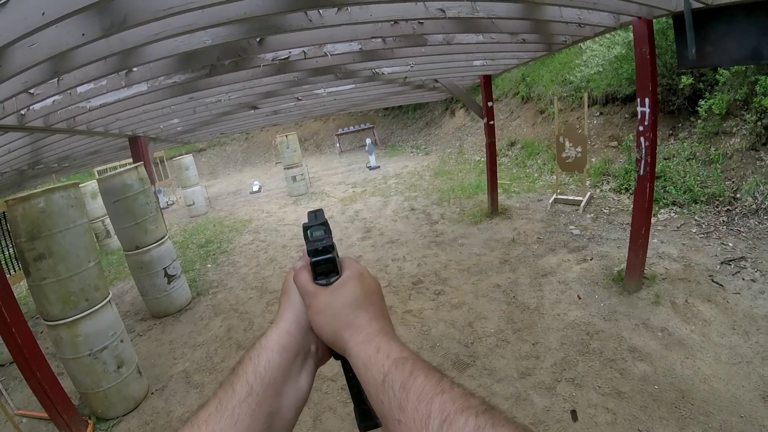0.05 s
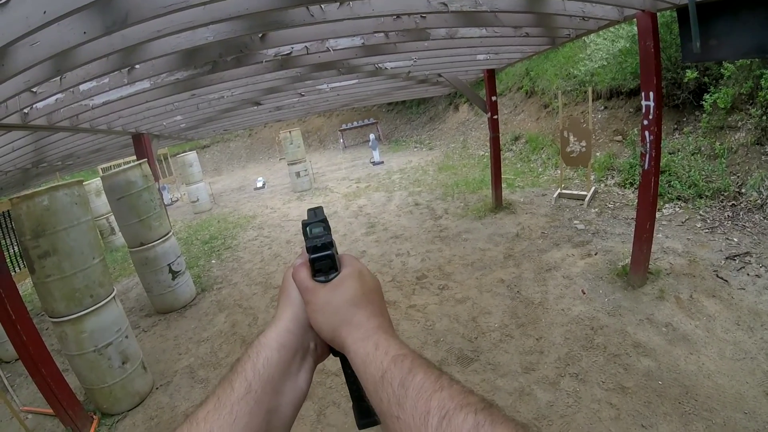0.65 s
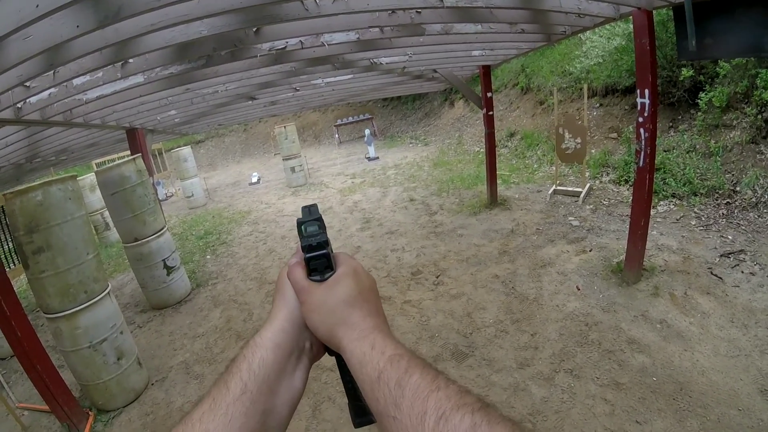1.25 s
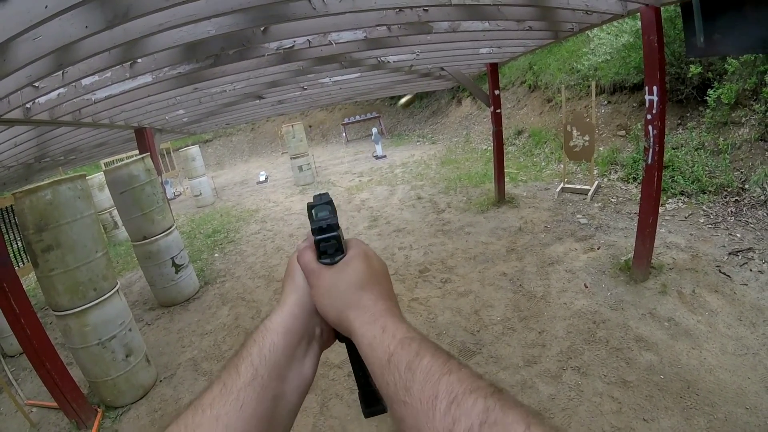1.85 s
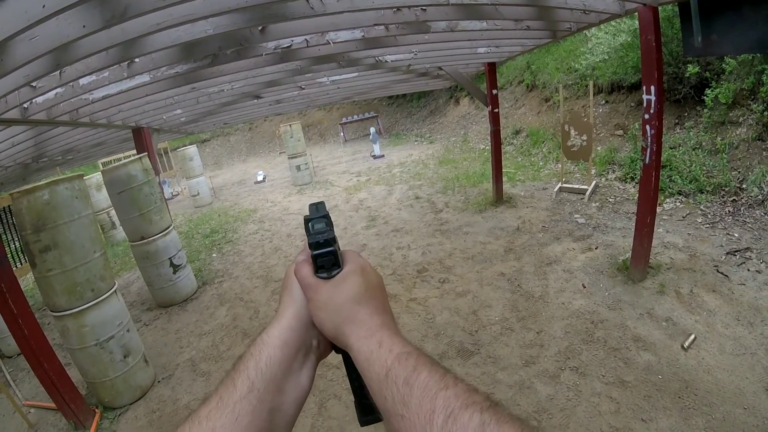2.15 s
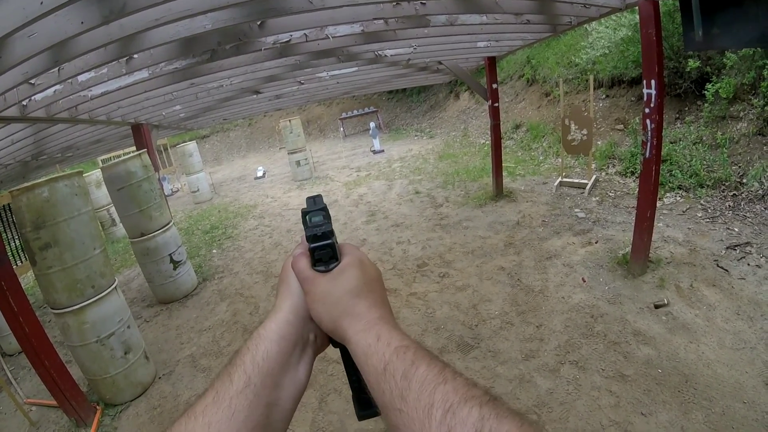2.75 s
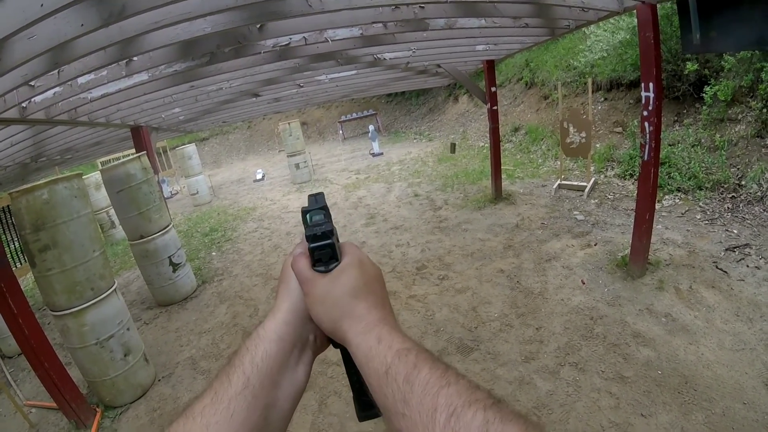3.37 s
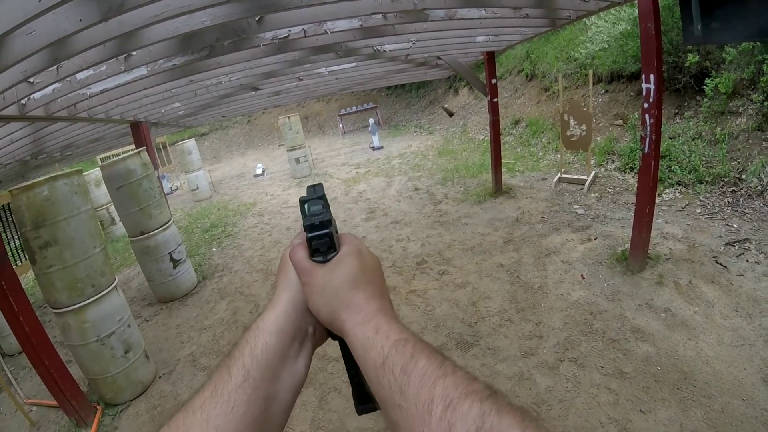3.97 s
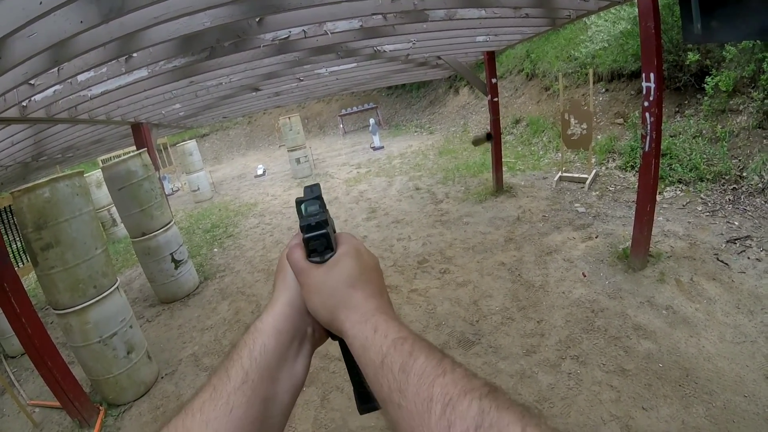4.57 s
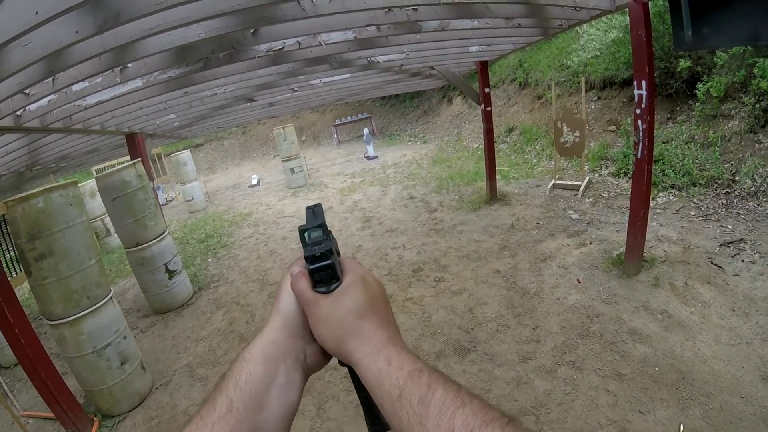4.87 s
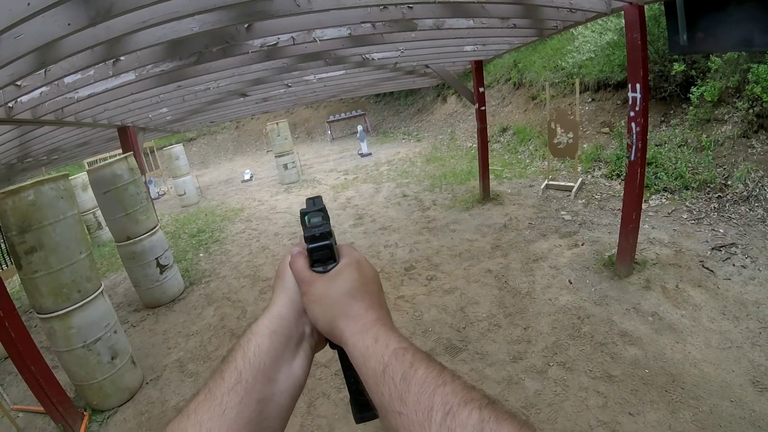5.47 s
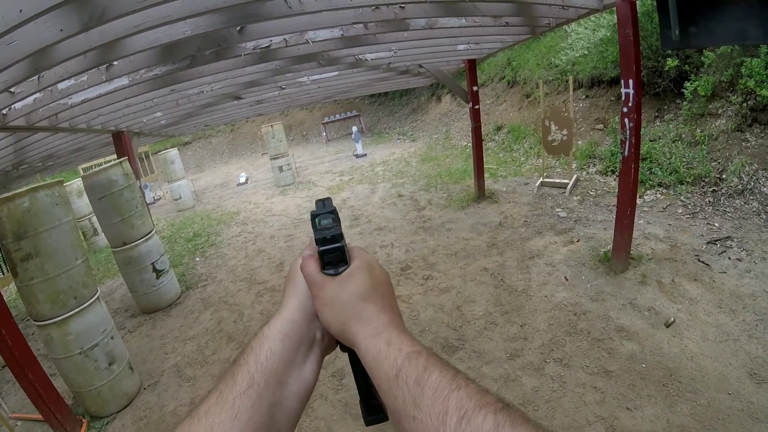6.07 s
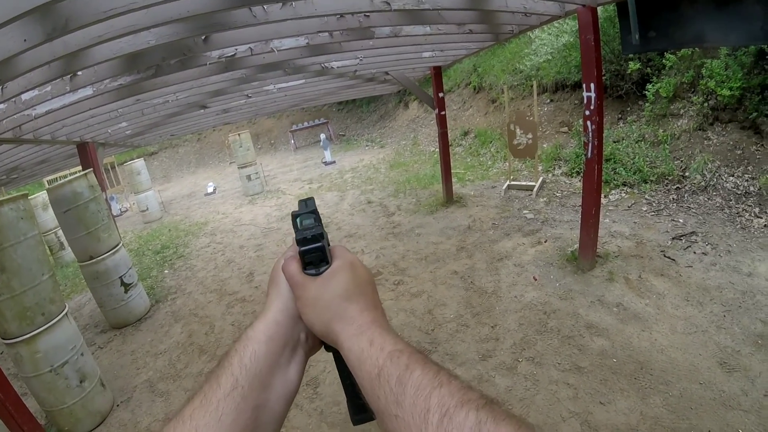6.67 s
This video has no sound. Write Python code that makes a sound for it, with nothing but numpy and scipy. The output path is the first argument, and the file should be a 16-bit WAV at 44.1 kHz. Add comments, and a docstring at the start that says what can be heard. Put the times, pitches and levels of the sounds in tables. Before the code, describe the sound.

A pistol fires nine single shots close to the microphone, mostly under a second apart, in a roofed outdoor shooting bay. Each sharp crack slaps off the roof and trails away in echoes. A faint trigger click follows most shots. The seventh and eighth shots each bring a bright ring from a steel plate, and the last comes right at the end.

```python
"""Pistol shots in a roofed shooting bay.

Each shot is a blast and a pressure wave, answered by the roof and by distant banks. The trigger clicks
as it resets, and two bullets ring steel plates, over faint ticks, thuds, hiss and rumble. The limiter
of a camera on the shooter's head ducks just ahead of each shot and recovers slowly, holding up the tail."""
import sys
import numpy as np
from scipy import signal
from scipy.fft import rfft, irfft, next_fast_len
from scipy.io import wavfile
from scipy.ndimage import uniform_filter1d, map_coordinates

SR = 44100
rng = np.random.default_rng(int(sys.argv[2]) if len(sys.argv) > 2 else 0)


def wav_record(signal):
    """Record a signal, one row per channel, as 16-bit PCM in the file named by sys.argv[1]."""
    frames = np.transpose(np.atleast_2d(signal))
    bounded = np.clip(frames, -1, 1)
    # unit amplitude maps onto the largest positive 16-bit level
    quanta = np.round(bounded * 32767).astype(np.int16)
    wavfile.write(sys.argv[1], SR, quanta)


N = 296352


def amp(db):
    """Amplitude ratio of a level in decibels."""
    return 10 ** (np.asarray(db) / 20)


def unit(x):
    """The signal scaled to an rms of 1."""
    return x / np.sqrt(np.mean(x ** 2) + 1e-20)


def add(track, start_s, sound):
    """Superposition: a sound sums into the track from its start time."""
    start = round(start_s * SR)
    part = sound[max(-start, 0):N - start]
    track[max(start, 0):][:len(part)] += part


def highpass(x, hz, order=2):
    """A Butterworth filter attenuates frequencies below its cutoff."""
    return signal.sosfilt(signal.butter(order, hz, "high", fs=SR, output="sos"), x)


def coloured(x, spectrum, resonances=()):
    """A minimum-phase filter of unit power gain imposes a spectrum with Lorentzian peaks and dips."""
    size = 2 * next_fast_len(len(x) // 2 + SR // 8)
    hz = np.fft.rfftfreq(size, 1 / SR)
    point_hz, point_db = np.transpose(spectrum)
    db = np.interp(np.log(hz + 1), np.log(point_hz), point_db)
    db += sum(lift / (1 + (2 * (hz - centre) / width) ** 2) for centre, width, lift in resonances)
    cepstrum = irfft(np.log(unit(amp(db))))
    cepstrum[1:size // 2] *= 2  # folding onto positive time makes the filter causal
    cepstrum[size // 2 + 1:] = 0
    return irfft(rfft(x, size) * np.exp(rfft(cepstrum)), size)[:len(x)]


def burst(envelope, passes=8):
    """A cluster of shocks: noise with a nearly flat spectrum under an envelope."""
    x = envelope * rng.standard_normal(len(envelope))
    for _ in range(passes):
        x = irfft(np.exp(1j * np.angle(rfft(x))), len(x))
        local_rms = np.sqrt(np.abs(uniform_filter1d(x * x, size=48)) + 1e-20)
        x *= envelope / local_rms
    return x


def shock(t, start_s, hold_s, fall_s):
    """Envelope of a shock: an abrupt front, a plateau and an exponential decay."""
    return (t >= start_s) * np.exp(-np.maximum(t - start_s - hold_s, 0) / fall_s)


def muzzle_blast(t):
    """The blast is a cluster of thin shocks, which carry little bass."""
    # Blast spectrum. Each row: frequency in Hz, relative level in dB.
    spectrum = [(100, -11.5), (400, 1), (800, -5), (1400, -4.5), (2200, -2), (3000, -6.5), (3800, -3.5),
                (4700, -13), (5700, -0.5), (6700, 2.5), (7500, -10.5), (9000, -15.5), (12000, -25.5),
                (16000, -47.5)]
    shocks = burst(shock(t, start_s=0, hold_s=.0018, fall_s=.00083))
    return highpass(coloured(shocks, spectrum), hz=150)


def pressure_wave(t, push_s, suction_at_s=.0038):
    """The expanding gas cloud sends out a compression followed by a rarefaction."""
    def lobe(age_s):
        phase = np.maximum(age_s / push_s, 0)
        return phase * np.exp(1 - phase)
    return .65 * (lobe(t) - lobe(t - suction_at_s))


def early_reflections(t, scatter_t60_s=.092):
    """The roof reflects the blast as a slap; beams and barrels then scatter it."""
    # Spectra of the slap and the scatter. Each row: frequency in Hz, relative level in dB.
    slap_spectrum = [(100, -6), (370, -22.5), (750, 0.5), (1100, 1), (2200, -2), (3300, -7), (4300, -3.5),
                     (5500, -6.5), (6600, -11), (7600, -8), (10000, -22.5), (16000, -53.5)]
    scatter_spectrum = [(60, -29.5), (200, -15), (330, 4.5), (750, 13.5), (1200, 5), (2500, 5.5),
                        (4200, -18.5), (5500, -23), (6600, -21), (7600, -21), (10000, -31), (12000, -37),
                        (16000, -53)]
    # Resonances under the roof. Each row: frequency in Hz, width in Hz, lift in dB.
    resonances = [(400, 150, 6), (570, 120, -3), (750, 180, 6), (1020, 130, -3), (2005, 120, 3),
                  (2520, 130, 3), (6650, 350, 3)]
    early = t[:SR // 4]
    roof = shock(early, start_s=.0043, hold_s=.001019, fall_s=.00063)
    slap = amp(17) * coloured(burst(roof), slap_spectrum, resonances)
    beams = amp(7 - 60 * early / scatter_t60_s) * (early > .002)
    barrels = amp(8) * shock(early, start_s=.0143, hold_s=.0027, fall_s=.0017)
    scatter = coloured(burst(np.hypot(beams, barrels)), scatter_spectrum, resonances)
    return highpass(np.pad(slap + scatter, (0, len(t) - len(early))), hz=150)


def tail_db(t, onset_s=.014, spreading_power=1.1464, loss_db_per_s=21.5):
    """Geometric spreading and absorption lower the level that returns t seconds after a shot."""
    travel_s = np.maximum(t, onset_s)
    return -20 * spreading_power * np.log10(travel_s / onset_s) - loss_db_per_s * (travel_s - onset_s)


def reverberation(t, build_s=.0053, patch_db=3, smooth_above_hz=2000):
    """Diffuse reflection: the banks return sound in patches, while air absorption drains the treble."""
    # Spectrum of the far reverberation. Each row: frequency in Hz, relative level in dB.
    spectrum = [(50, -10), (150, -13), (250, -6.5), (380, -1), (600, -0.5), (850, 1.5), (1500, -0.5),
                (3200, -2.5), (4200, -3.5), (5200, -3.5), (6600, -7.5), (7300, -12.5), (9500, -22.5),
                (14000, -58.5)]
    # Its broad resonances. Each row: frequency in Hz, width in Hz, lift in dB.
    resonances = [(363, 200, 4), (816, 57, 1.5), (4135, 700, -6), (6480, 250, 6)]
    noise = coloured(rng.standard_normal(len(t)), spectrum, resonances)
    hz, frame_s, frames = signal.stft(noise, SR, nperseg=256)
    absorption_db = 17 * (hz[:, None] / 6000) ** 1.5 * (frame_s - .15)
    patches = uniform_filter1d(rng.standard_normal(frames.shape), size=5, axis=0)
    patches = unit(uniform_filter1d(patches, size=5, axis=1))
    depth_db = patch_db / (1 + (hz[:, None] / smooth_above_hz) ** 2)
    ripple_db = depth_db * patches - depth_db ** 2 * np.log(10) / 20  # mean power is conserved
    tail = signal.istft(frames * amp(ripple_db - absorption_db), SR, nperseg=256)[1][:len(t)]
    return tail * amp(tail_db(t)) * np.minimum(t / build_s, 1) ** 2


def echoes(t, centre_hz=710):
    """Distant banks and neighbouring bays reflect the blast as smeared, band-limited echoes."""
    # Echoes. Each row: delay in seconds, level in dB relative to the diffuse tail.
    arrivals = [(.027, 0.5), (.042, -2), (.052, 0), (.064, 0.5), (.135, -0.5), (.198, -3.5), (.245, -2.5)]
    # Echo spectrum. Each row: multiple of the centre frequency, relative level in dB.
    shape = [(.2, -24), (.65, -4), (1, 0), (1.5, -5), (3, -18), (6, -40), (14, -75)]
    early = t[:SR // 2]
    returns = sum(amp(tail_db(delay_s) + db) * burst(shock(early, delay_s, hold_s=.004, fall_s=.006))
                  for delay_s, db in arrivals)
    spectrum = np.multiply(shape, [centre_hz, 1])
    return np.pad(coloured(returns, spectrum), (0, len(t) - len(early)))


def pistol(variation_rad=.57):
    """The shooter barely moves, so each shot excites nearly the same impulse response of the bay."""
    # Shots, the first already dying away. Each row: start in seconds, blast level in dB,
    # pressure wave level in dB, rise time of its push in seconds.
    shots = [(-.37, 17.5, 10, .0017), (0.3362, 17, 13, 0.0022), (0.9473, 16.5, 23, 0.002),
             (1.8663, 17, 19, 0.00032), (2.492, 17, 18, 0.00042), (3.2671, 18, 20, 0.0021),
             (3.9482, 17.5, 19, 0.00066), (4.5558, 21, 26, .0017), (5.7832, 20.5, 24, 0.0017),
             (6.4889, 18, 23, 0.0014)]
    out, t = np.zeros(N), np.arange(3 * SR // 2) / SR
    early = t[:SR // 16]
    shared = np.cos(variation_rad) * (early_reflections(t) + reverberation(t)) + echoes(t)
    for start_s, blast_db, wave_db, push_s in shots:
        direct = amp(blast_db) * muzzle_blast(early) + amp(wave_db) * pressure_wave(early, push_s)
        add(out, start_s, direct)
        varying = np.sin(variation_rad) * (early_reflections(t) + reverberation(t))
        add(out, start_s, shared + varying)
    return out


def outdoors(swell_db=15.5, swell_at_s=5.65, swell_width_s=.82):
    """Ambient noise: faint open-air hiss over a low rumble that swells once."""
    # Spectra of the hiss and the rumble. Each row: frequency in Hz, relative spectral density in dB.
    hiss_spectrum = [(15, -54.5), (25, 1), (70, -5.5), (173, -19.5), (498, -11), (2190, -17.5),
                     (2640, -19.5), (4370, -33.5), (6670, -27), (11900, -43.5), (14000, -53.5)]
    rumble_spectrum = [(20, -3.5), (40, 3), (65, 6.5), (100, -23), (200, -20.5), (600, -79.5)]
    swell = np.exp(-((np.arange(N) / SR - swell_at_s) / swell_width_s) ** 2)
    rumble = amp(-76.5 + swell_db * swell) * coloured(rng.standard_normal(N), rumble_spectrum)
    hiss = amp(-62) * coloured(rng.standard_normal(N), hiss_spectrum)
    return rumble + hiss


def clicks(events, hz, t60_s=.03):
    """Heavily damped transients: dry snaps of noise around one centre frequency."""
    out, t = np.zeros(N), np.arange(SR // 10) / SR
    spectrum = [(hz / 8, -16), (hz * .55, -3), (hz, 0), (hz * 1.5, -10), (hz * 2.3, -32), (hz * 3, -62)]
    for start_s, db in events:
        add(out, start_s, amp(db) * coloured(burst(amp(-60 * t / t60_s)), spectrum))
    return out


def trigger_resets():
    """The trigger resets with a bright transient about a quarter of a second after most shots."""
    # Resets. Each row: start in seconds, level in dB.
    resets = [(1.294, -30.5), (2.0944, -29), (2.7756, -30), (3.5259, -28), (4.2343, -27), (4.8204, -28),
              (6.0544, -35)]
    return clicks(resets, hz=5470)


def distant_ticks():
    """Fainter, duller transients: two arrive from out in the bay, and one is the first plate landing."""
    # Ticks, the second being the first plate as it lands. Each row: start in seconds, level in dB.
    ticks = [(1.673, -48), (5.078, -47), (5.272, -52)]
    return clicks(ticks, hz=3980)


def thuds(swell_s=.0091):
    """Low, narrow-band noise that swells and decays within a few cycles is heard as a soft bump."""
    # Thuds. Each row: start in seconds, peak level in dB, centre frequency in Hz.
    bumps = [(3.185, -39, 130), (5.08, -44, 165), (5.585, -50, 225)]
    out, t = np.zeros(N), np.arange(SR // 5) / SR
    for start_s, db, hz in bumps:
        spectrum = [(hz / 3, -22), (hz * .8, -6), (hz, 0), (hz * 1.3, -10), (hz * 4, -34), (hz * 30, -80)]
        body = coloured(rng.standard_normal(len(t)), spectrum) * t / swell_s * np.exp(-t / swell_s)
        add(out, start_s, amp(db) * body / np.abs(body).max())
    return out


def steel_plates(splash_db=-3, splash_t60_s=.032, held_below_hz=2800):
    """A bullet splashes on a plate and excites its normal modes, which are damped when it lands."""
    # Impacts. Each row: start in seconds, level in dB, seconds until landing, loss on landing in dB.
    hits = [(4.684, -25, 0.41, 10), (5.917, -28.5, 0.33, 6.5)]
    # Modes, one list a plate. Each row: frequency in Hz, level in dB, 60 dB decay time in seconds.
    plates = [
        [(1100, -7.5, 1.75), (1650, -25, 2.1), (2610, -9, 1.93), (2870, -11, 1.5), (3130, 0, 1.23),
         (4072, -13, 0.63), (4670, -5.5, 1.07), (5300, -7, 1.07), (6150, -2.5, 0.65), (7540, -12, 0.64),
         (7850, -22, 0.86), (8290, -2, 0.21), (8480, -27, 1.4), (9400, -23, 0.58), (11400, -26, 0.47)],
        [(1290, -15, 1.3), (1920, -18, 2.3), (2660, -2, 1.3), (5330, 4, 0.59), (6510, 1.5, 0.78),
         (6580, 2.5, 0.52), (6620, -3.5, 0.67), (8000, -6.5, 0.47), (9255, -21, 0.46), (10870, -11.5, 0.55)],
    ]
    splash_spectrum = [(500, -20), (3000, 0), (7000, -3), (15000, -55)]
    out, t = np.zeros(N), np.arange(3 * SR // 2) / SR
    direct = (.6 + .5 * np.exp(-t / .04)) * np.minimum(t / .003, 1)
    echoed = .48 * np.minimum(t / .03, 1)
    for (start_s, db, lands_s, landing_db), modes in zip(hits, plates):
        landed = np.clip((t - lands_s) / .022, 0, 1)
        ring = np.zeros(len(t))
        for hz, mode_db, t60_s in modes:
            # Echoes build up and interfere with each mode, so it flutters, the high ones faster.
            flutter_hz = 42 * max(1, hz / 3500)
            real, imag = [map_coordinates(knots, [t * flutter_hz], mode="wrap")
                          for knots in rng.standard_normal((2, 256))]
            tone = np.imag((direct + echoed * (real + 1j * imag)) * np.exp(2j * np.pi * hz * t))
            # Landing restrains the wide swings of the low modes most.
            damping_db = landing_db * landed * min(1, held_below_hz / hz)
            ring += amp(mode_db - 60 * t / t60_s - damping_db) * tone
        splash = coloured(rng.standard_normal(len(t)), splash_spectrum)
        splash *= amp(splash_db - 60 * t / splash_t60_s)
        add(out, start_s, amp(db) * (ring + splash))
    return out


def scene():
    """Superposition of all sources, alike in both channels."""
    mix = pistol() + steel_plates() + trigger_resets() + distant_ticks() + thuds() + outdoors()
    return np.tile(mix, (2, 1))


def limiter_gain(x, threshold_db=-17.5, release_s=.23, block_s=.032, offset_s=.0255):
    """Look-ahead limiting: the gain falls for the loudest sound up to a block ahead and recovers slowly."""
    power = uniform_filter1d(highpass(x, hz=300) ** 2, size=352, origin=175)
    level_db = 10 * np.log10(np.abs(power) + 1e-12)
    block = block_s * SR
    edges = np.round(np.arange(block - offset_s * SR, N, block)).astype(int)
    excess_db = np.split(np.maximum(level_db - threshold_db, 1e-6), edges)
    ahead_db = [np.maximum(np.maximum.accumulate(now[::-1])[::-1], following.max())
                for now, following in zip(excess_db, excess_db[1:] + excess_db[-1:])]
    # Each cut in dB decays exponentially until a deeper one takes over.
    age = np.arange(N) / SR / release_s
    cut_db = np.exp(np.maximum.accumulate(np.log(np.concatenate(ahead_db)) + age) - age)
    return uniform_filter1d(amp(-cut_db), size=128)


def record(dry, saturation=.8, top_hz=15900):
    """The camera limits the level, saturates softly, blocks steady pressure and limits the bandwidth."""
    limited = dry * limiter_gain(dry[0])
    rounded = limited / (1 + np.abs(limited / saturation) ** 6) ** (1 / 6)
    centred = highpass(rounded, hz=12, order=1)
    size = next_fast_len(N + SR // 4)
    passband = np.fft.rfftfreq(size, 1 / SR) < top_hz
    return irfft(rfft(centred, size) * passband, size)[:, :N]


dry = scene()
out = record(dry)
wav_record(out)
```